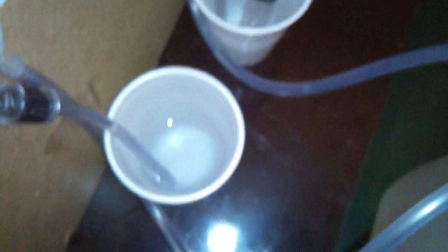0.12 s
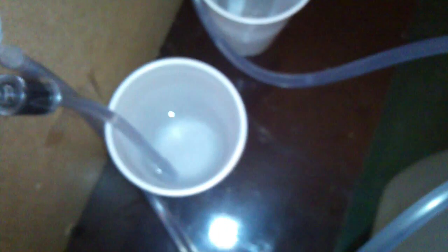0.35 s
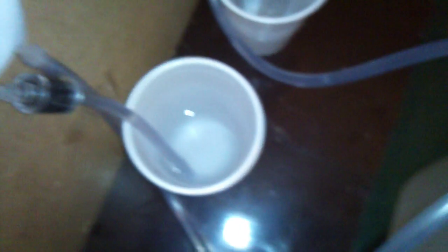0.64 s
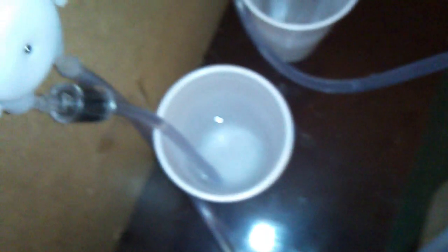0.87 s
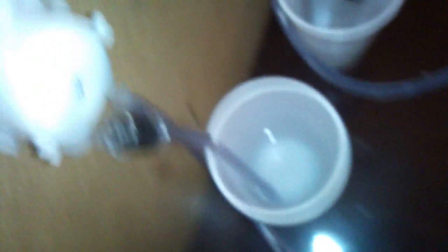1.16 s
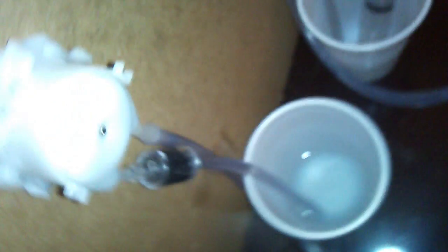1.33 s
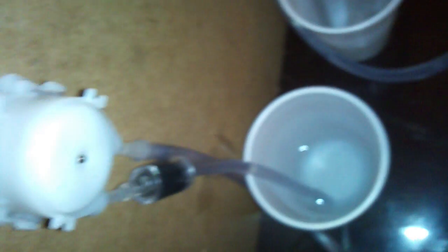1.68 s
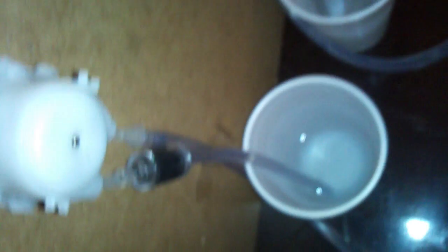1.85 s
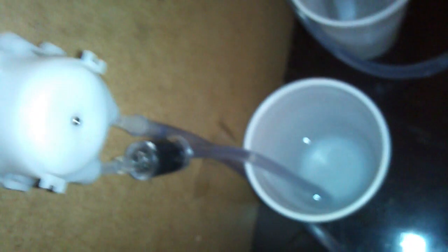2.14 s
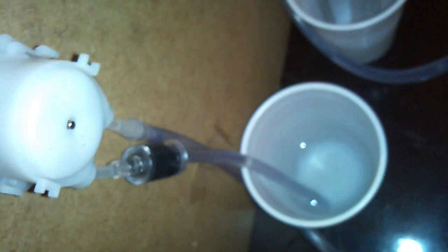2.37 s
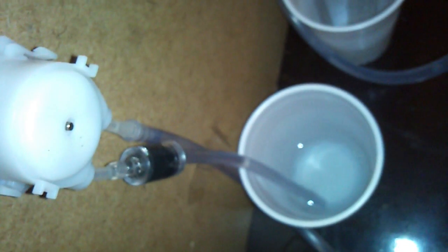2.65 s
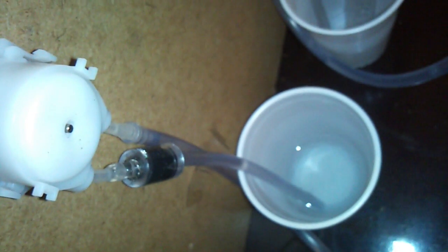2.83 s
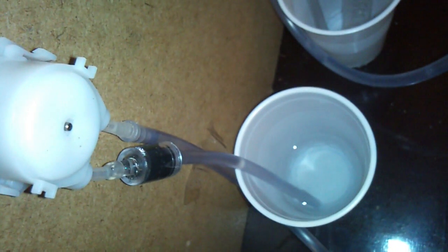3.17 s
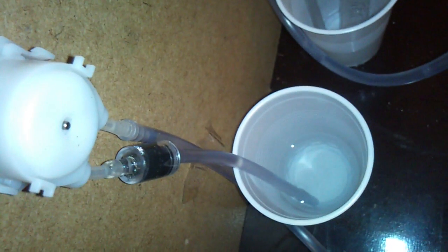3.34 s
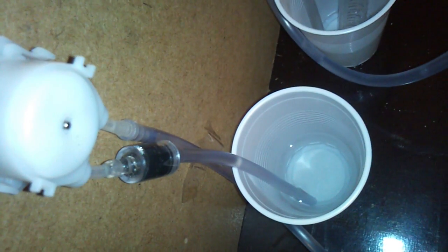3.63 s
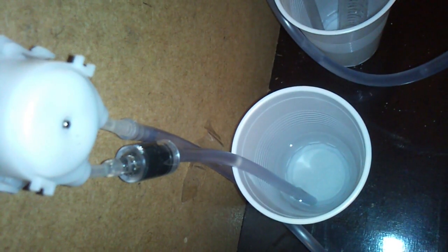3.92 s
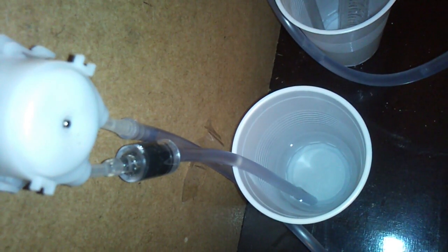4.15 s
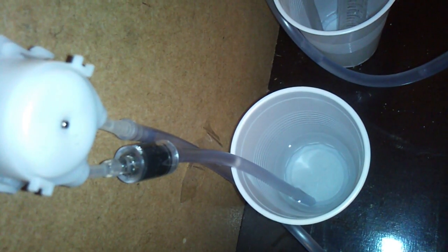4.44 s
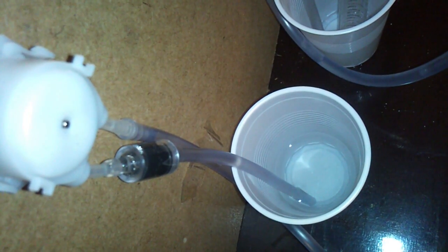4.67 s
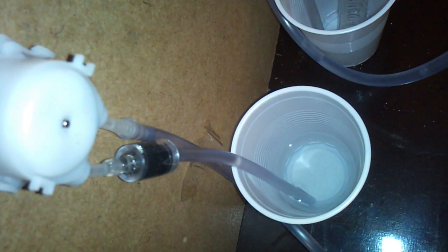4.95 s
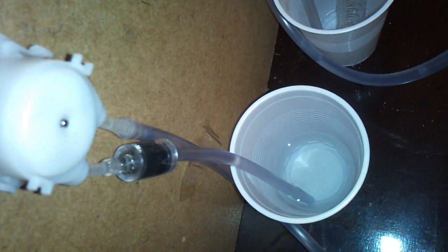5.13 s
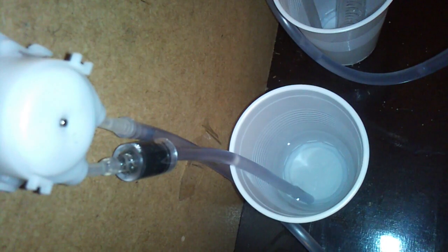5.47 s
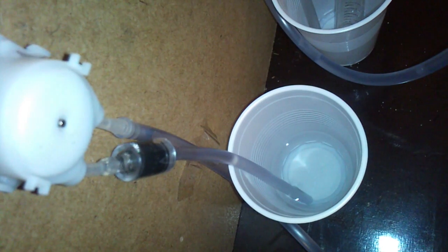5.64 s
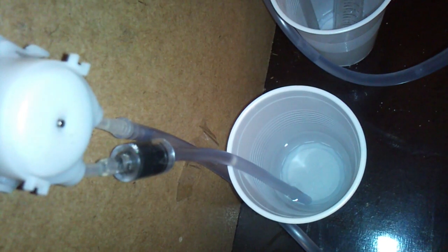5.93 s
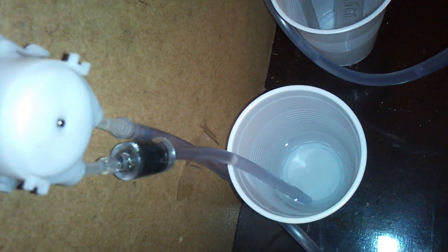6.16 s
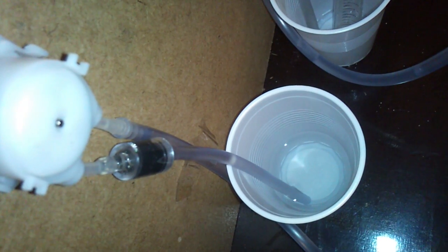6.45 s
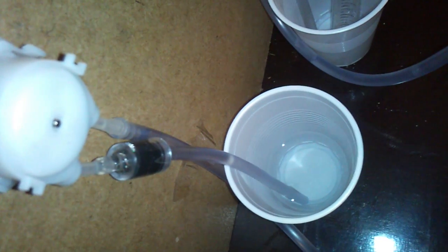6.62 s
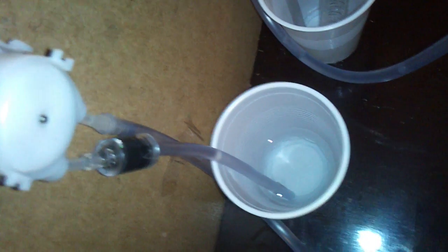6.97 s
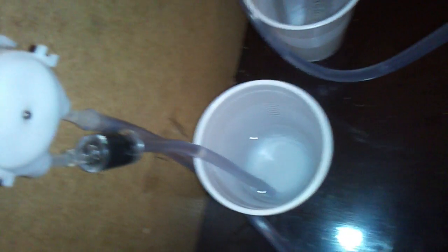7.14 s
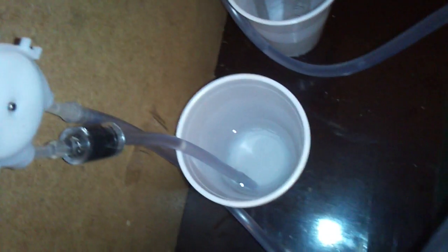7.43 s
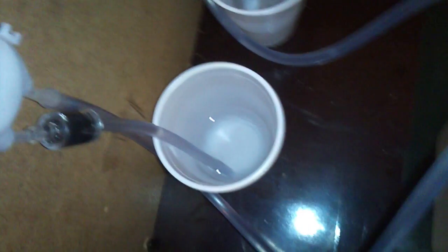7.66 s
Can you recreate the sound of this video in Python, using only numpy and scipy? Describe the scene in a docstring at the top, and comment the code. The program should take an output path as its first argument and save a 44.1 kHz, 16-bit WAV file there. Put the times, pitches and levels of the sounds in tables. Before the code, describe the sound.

Low wavering motor hum, soft wet patter in a plastic cup, a hand scraping and clicking plastic near the microphone, then one brief dragging rasp.

```python
"""From the start the hum of a small dosing pump on a table runs throughout, with mains hum and faint hiss, at
one microphone. The pump, a wavering tone with ringing friction noise, pushes liquid through a tube into a
plastic cup: soft, uneven pats made of decaying cup modes, with tiny bubbles, dry ticks and one faint squeak.
A hand scrapes (stick-slip noise) and clicks (struck modes) on the housing close to the microphone; later
something is dragged with a short rasp of friction noise that surges evenly. The recorder is narrow-band."""
import sys
import numpy as np
from scipy import signal
from scipy.fft import rfft, irfft, next_fast_len
from scipy.io import wavfile
from scipy.ndimage import map_coordinates

SR = 44100
rng = np.random.default_rng(int(sys.argv[2]) if len(sys.argv) > 2 else 0)


def unload_audio(sound):
    """Save the sound as a 16-bit wav file, at the path given as the first command line argument."""
    columns = np.transpose(np.atleast_2d(sound))
    # keep every value between -1 and 1, then stretch to whole-number steps
    steps = np.round(np.clip(columns, -1, 1) * 32767)
    wavfile.write(sys.argv[1], SR, steps.astype(np.int16))


N = 343539
T = np.arange(N) / SR  # t/s of every sample


def amp(db):
    """Decibels to gain."""
    return 10 ** (np.asarray(db) / 20)


def unit(x):
    """Scale to rms 1."""
    return x / np.sqrt(np.mean(x ** 2) + 1e-20)


def curves(rows):
    """One value per sample for each column after the time."""
    s, *columns = np.transpose(rows)
    return [np.interp(T, s, column) for column in columns]


def wobble(rate):
    """A smooth random curve, rate knots a second."""
    knots = rng.standard_normal(int(N * rate / SR) + 4)
    return map_coordinates(knots, [T * rate])


def filtered(x, response):
    """x times a response of frequency."""
    m = next_fast_len(N + SR // 2)
    spectrum = rfft(x, m) * response(np.fft.rfftfreq(m, 1 / SR))
    return irfft(spectrum, m)[:N]


def coloured(x, points):
    """x shaped by (f/Hz, level/dB) points, at rms 1."""
    f, db = np.transpose(points)
    return unit(filtered(x, lambda hz: amp(np.interp(np.log(hz + 1), np.log(f), db))))


def resonant(x, rings):
    """x through (f/Hz, width/Hz, level/dB) resonances of alternating sign, at rms 1."""
    def response(f):
        total = 0
        for k, (centre, width, db) in enumerate(rings):
            damping = 1j * f * width
            total = total + (-1) ** k * amp(db) * damping / (centre * centre - f * f + damping)
        return total
    return unit(filtered(x, response))


def grains(rate, spread_db):
    """Random tiny impulses of uneven size, at rms 1."""
    present = rng.random(N) < rate / SR
    size = rng.standard_normal(N)
    spread = amp(spread_db * np.clip(rng.standard_normal(N), -2, 2))
    return unit(present * size * spread)


def blows(times, db):
    """One impulse at each time."""
    return np.bincount(np.round(np.asarray(times) * SR).astype(int), amp(db), N)[:N]


def played(strikes, sound):
    """The same sound at every strike."""
    return signal.fftconvolve(strikes, sound)[:N]


def add(track, s, sound):
    """Mix a sound into a track at time s."""
    part = track[round(s * SR):][:len(sound)]
    part += sound[:len(part)]


def modes(table, attack):
    """One decaying complex wave per mode, so that each strike can set its own phase."""
    t = np.arange(SR // 3) / SR
    hz, db, t60 = np.transpose(table)[:, :, None]
    return amp(db - 60 * t / t60) * np.exp(2j * np.pi * hz * t) * (1 - np.exp(-t / attack))


def bursts(times, db, colour, t60):
    """Coloured noise that flares at each time and dies away."""
    t = np.arange(SR // 3) / SR
    decay = amp(-60 * t / t60) ** 2 * (1 - np.exp(-t / 0.0046))
    power = played(blows(times, db) ** 2, decay)
    return np.sqrt(abs(power)) * coloured(rng.standard_normal(N), colour)


def stroke(start, length, swell_db, rise_db_per_s, fall_db_per_s):
    """Gain of one rubbing movement: a quick rise, a hold that swells or eases off, a release."""
    t = T - start
    hold = swell_db * (np.clip(t / length, 0, 1) - .5)
    rise = rise_db_per_s * np.maximum(-t, 0)
    fall = fall_db_per_s * np.maximum(t - length, 0)
    return amp(hold - rise - fall)


# the pump motor's tone, before its wavering: t/s, f/Hz, level/dB (rms)
MOTOR_COURSE = [(0.0, 118.3, -63), (0.19, 120.8, -54), (0.43, 120.1, -60.5), (0.67, 124.6, -64.5),
                (1.26, 124.2, -64.5), (1.34, 116, -66.5), (1.54, 120.7, -56.5), (1.93, 117.5, -60.5),
                (2.91, 121.8, -55), (3.58, 122.7, -61), (4.47, 121.3, -54.5), (4.6, 124.9, -62),
                (5.12, 118.4, -55), (5.19, 118.3, -67), (5.32, 120.8, -56), (7.03, 122.1, -58),
                (7.7, 119.8, -55), (7.79, 121, -64)]
# mains hum: f/Hz, level/dB (rms)
MAINS_HUM = [(50, -72.5), (100, -63), (200, -70), (300, -68.5)]
# spectrum of the motor's shudder: f/Hz, relative level/dB
SHUDDER_COLOUR = [(68, -35.5), (88, -6), (97, -9), (110, 0.5), (130, -2), (150, -27.5), (220, -48)]


def pump(waver_db=0.36, waver_hz=0.85, flutter_db=0.75, rumble_db=-68.0):
    """The motor's tone sags and recovers with the load and wavers over a low shudder and mains hum."""
    hz, db = curves(MOTOR_COURSE)
    level = amp(db + waver_db * wobble(10) + flutter_db * wobble(28))
    phase = 2 * np.pi * np.cumsum(hz + waver_hz * wobble(7.1)) / SR
    motor = level * np.sin(phase)
    mains = sum(amp(db) * np.sin(2 * np.pi * (f * T + rng.random())) for f, db in MAINS_HUM)
    shudder = amp(rumble_db) * coloured(rng.standard_normal(N), SHUDDER_COLOUR)
    return np.sqrt(2) * (motor + mains) + shudder


# what the running pump keeps ringing in its casing and the table: f/Hz, width/Hz, relative level/dB
CASING_RINGS = [(185, 8.7, -1.5), (278.7, 14, 2), (303.2, 14, 5.5), (364, 20, -10), (426, 12, -7.5),
                (525, 29, -8), (614.5, 14, -3.5), (685.4, 14, 7.5), (756, 13, -1), (809, 32, -6.5),
                (955, 16, -5)]


def whirr(level_db=-65, pulsing=0.6, waver_db=2.5):
    """The mechanism rubs once a turn, now harder, now softer, and keeps the casing's resonances sounding."""
    hz, _ = curves(MOTOR_COURSE)
    turning = np.sin(2 * np.pi * np.cumsum(hz) / SR)
    rubbing = (1 + pulsing * turning) * rng.standard_normal(N)
    return amp(level_db + waver_db * wobble(12)) * resonant(rubbing, CASING_RINGS)


# spectrum of the room noise: f/Hz, relative level/dB
ROOM_COLOUR = [(15, -3.5), (35, -7), (70, -9), (150, -4), (240, -8.5), (300, -2.5), (380, -9), (560, -5.5),
               (690, -4.5), (800, -6), (1000, -14.5), (1500, -17.5), (2500, -20), (4000, -23),
               (7200, -27.5)]


def room(level_db=-62):
    """A steady, slightly wavering background of coloured noise."""
    return amp(level_db + 0.62 * wobble(7.7)) * coloured(rng.standard_normal(N), ROOM_COLOUR)


# faint rustles of handling: t/s, level/dB
HAND_RUSTLES = [(0.005, -56), (.41, -59), (.92, -67.5)]
# their spectrum: f/Hz, relative level/dB
DRY_RUSTLE_COLOUR = [(300, 2.5), (1000, 1), (2800, -6.5), (4000, -18.5), (7000, -19)]
RUSTLE_FADE_DB_PER_S = 132  # on either side of each peak


def rustle():
    """Faint dry rustles, dense uneven grains, swell and fade while the hand moves into place."""
    gain = sum(amp(db - RUSTLE_FADE_DB_PER_S * abs(T - s)) for s, db in HAND_RUSTLES)
    return gain * coloured(grains(rate=3700, spread_db=-4.0), DRY_RUSTLE_COLOUR)


# the pats of liquid, before trims: t/s, level/dB, brightness/dB, after-slap level/dB re the pat
LIQUID_PATS = [(0.052, -39, -9, -11), (0.288, -45, -12, -18), (0.331, -40.5, -9, 1.5),
               (0.452, -36.5, -6, -13), (0.512, -39, -12, 2.5), (0.59, -39.5, -18, -3.5),
               (0.672, -39.5, -7, 4), (0.775, -46, -14, 3), (0.831, -43, -16, 1.5), (0.888, -37, -18, -21),
               (0.913, -42, -5, 6), (2.073, -35.5, 0, 1), (2.134, -45.5, -13, -16), (2.195, -36.5, -3, -5),
               (2.245, -41.5, -9, -8), (2.338, -44.5, -5, -14), (2.388, -41.5, -11, -10),
               (2.433, -35, -3.5, 0), (2.56, -53, -14, -4), (2.688, -51, -15, -14), (2.735, -48, -10, -18),
               (2.775, -34.5, -0.5, -15), (2.833, -39.5, -11, -6), (2.915, -33, 0, -5),
               (2.971, -41, -7, -15), (3.009, -38.5, -14, -9), (3.19, -47, -12, -9),
               (3.229, -39.5, -11.5, -22), (3.272, -47.5, -14, -7), (3.414, -37, -14, -1.5),
               (3.496, -41.5, -13, -12), (3.517, -36.5, -10, -9), (3.578, -41.5, -10, -5),
               (3.655, -34, -1, 1), (3.716, -38.5, -7, 3.5), (3.796, -39.5, -14, -9),
               (3.886, -49, -14, -12), (3.914, -50.5, -14, -12), (3.96, -50, -12, -12),
               (4.008, -49, -4, -14), (4.074, -43.5, -14, -18), (4.112, -43.5, -9, -13),
               (4.21, -51.5, -16, -13), (4.255, -43.5, -7, 0.5), (4.342, -44.5, -14, -13),
               (4.386, -45, -16, -19), (4.436, -33.5, 1, -11), (4.495, -37, -7, 1), (4.643, -47.5, -16, -8),
               (4.755, -44, -8, -17), (4.792, -43, -11, -14), (4.835, -33, -7.5, -1.5),
               (4.917, -44.5, -12, -15), (4.954, -49, -14, -15), (4.998, -34.5, -3, -12),
               (5.055, -44, -10, -12), (5.091, -38, -14, -9), (5.138, -40, -10, 6), (5.298, -33.5, -3, -19),
               (5.355, -41, -9, -11), (5.393, -43.5, -9, -11), (5.435, -34, -2.5, 2.5),
               (5.496, -34.5, -3, -14), (6.193, -45.5, -18, -8), (6.274, -45, -12, -14),
               (6.333, -45, -3, -15), (6.373, -41.5, -12, -15), (6.44, -55, -14, -18),
               (6.468, -48, -14, -15), (6.603, -48, -14, -17), (6.657, -43, -10, -13),
               (6.693, -39, -12, -15), (6.777, -33.5, -2.5, -0.5), (6.835, -48, -11, -9),
               (6.897, -40, -8, 7), (6.978, -41, -11, -11), (7.03, -50, -16, -10), (7.07, -45, -15, -16),
               (7.1, -45.5, -14, -12), (7.14, -38, -13, -3.5), (7.197, -35, -2.5, 1),
               (7.253, -43.5, -8, -14), (7.299, -33, -3.5, -12), (7.356, -44.5, -8, -10),
               (7.453, -49, -9, -15), (7.497, -39.5, -3.5, -0.5), (7.588, -47.5, -15, -12),
               (7.696, -42, -7, 0.5), (7.78, -34, -2.5, -12)]
SLAP_S, SLAP_BRIGHT_DB = 0.019, -18.5  # a dull after-slap follows each pat
SMALL_PER_S, SMALL_DB, SMALL_SPREAD_DB, SMALL_BRIGHT_DB = 10, -54, 3, -7  # weak pats in between


def pushes(count=120):
    """Every push of the liquid as (t/s, level/dB, brightness/dB): pats, after-slaps, random faint pats."""
    rows = []
    for s, db, bright, slap in LIQUID_PATS:
        rows += [(s, db, bright), (s + SLAP_S, db + slap, SLAP_BRIGHT_DB)]
    for k, (when, size) in enumerate(rng.random((count, 2))):
        level = SMALL_DB + SMALL_SPREAD_DB * (2 * size - 1)
        rows.append(((k + when) / SMALL_PER_S, level, SMALL_BRIGHT_DB))
    return rows


# what every pat rings in the cup, the push itself dying fastest: f/Hz, relative level/dB, t60/s
CUP_MODES = [(190.5, -20.5, 0.24), (279.8, -21, 0.36), (305.5, -14.5, 0.21), (370.7, -21, 0.16),
             (429, -18, 0.14), (530.4, -15.5, 0.097), (614, -16, 0.18), (688, -9.5, 0.13), (761, -2, 0.033),
             (783, -14.5, 0.092), (816, -12.5, 0.081), (890, -12.5, 0.056), (954.4, -11.5, 0.11),
             (1045, -23, 0.062), (1202, -9, 0.1), (1251, 1, 0.037), (1275, -8.5, 0.082), (1300, -26, 0.058),
             (1440, -25.5, 0.026), (1603, -18, 0.071), (1850, -30, 0.1)]
# spectrum of the wet smack: f/Hz, relative level/dB
SMACK_COLOUR = [(400, -17), (800, -1), (1050, -2.5), (1300, -3), (1600, -10), (1900, -14.5), (2600, -25),
                (5000, -45)]
# spectrum of the sloshing liquid: f/Hz, relative level/dB
SLOSH_COLOUR = [(120, -23.5), (280, -2.5), (450, -0.5), (750, -16.5), (1000, -7.5), (1130, -8.5),
                (1300, -14), (1500, -23), (2200, -27.5), (4000, -37)]


def patter(trim_db=-1.13, bright_trim_db=-2, vary_db=1.67, detune=0.016, tail_db_per_s=50,
           slosh_db=-22.5, slosh_t60=0.26, smack_db=-15, smack_t60=0.11):
    """Each pat softly pushes the cup's modes, never quite alike; bright pats drive the upper modes more."""
    upper = np.transpose(CUP_MODES)[0] > 1130
    waves = modes(CUP_MODES, attack=np.where(upper, .0022, .0026)[:, None])
    out, rows, t = np.zeros(N), pushes(), np.arange(SR // 3) / SR
    phases = np.exp(2j * np.pi * rng.random((len(rows), len(CUP_MODES))))
    chances = rng.standard_normal((len(rows), len(CUP_MODES) + 2))
    for (s, db, bright), phase, (pitch, tail, *chance) in zip(rows, phases, chances):
        brightness = upper * (bright + bright_trim_db)
        gains = phase * amp(db + trim_db + brightness + vary_db * np.array(chance))
        low_ring = ((gains * ~upper) @ waves).imag
        high_ring = ((gains * upper) @ waves).imag
        # only the upper modes shift in pitch from pat to pat
        high_ring = np.interp(t * (1 + detune * pitch), t, high_ring)
        add(out, s, (low_ring + high_ring) * amp(tail_db_per_s * np.tanh(tail) * t))
    s, db, bright = np.transpose(rows)
    # a wet smack, strongest on loud bright pats, opens each push; the liquid sloshes on briefly
    smacks = bursts(s, db + bright + smack_db, SMACK_COLOUR, t60=smack_t60)
    sloshing = bursts(s, db + slosh_db, SLOSH_COLOUR, t60=slosh_t60)
    return out + smacks + sloshing


# the clearest tiny bubbles, ticks and a squeak in the tube:
# t/s, level/dB before the gain, f/Hz, ringing/cycles
TUBE_BUBBLES = [(0.873, -61, 6520, 4.3), (0.922, -56, 5990, 2.2), (2.3747, -53, 3350, 3),
                (3.0614, -55, 1729, 10), (3.3488, -53, 4600, 4.5), (3.3728, -50, 4800, 3.7),
                (3.377, -66, 4760, 150), (3.5206, -55, 7000, 1.6), (3.688, -55.5, 6200, 3.4),
                (3.838, -58, 1593, 9.7), (3.9692, -50.5, 1670, 4.3), (4.2522, -56, 2720, 5),
                (4.362, -62, 6070, 3.7), (4.466, -50, 5910, 1.6), (4.518, -47.5, 1730, 8),
                (4.717, -58, 6600, 2.28), (4.7623, -55.5, 5650, 2), (4.7942, -57, 5960, 2),
                (5.304, -51.5, 2804, 4.4), (5.475, -49.5, 2830, 7), (5.7244, -44.5, 6400, 2.9),
                (6.215, -59, 2954, 9), (6.217, -58.5, 5620, 18), (6.272, -61, 2760, 13),
                (6.2729, -46, 1750, 3.4), (6.2739, -43.5, 1436, 6), (6.289, -53, 1440, 21),
                (6.8713, -53, 4670, 5), (7.652, -52, 2284, 1.4)]
FIZZ_DB, FIZZ_HZ, FIZZ_CYCLES = -59, (2440, 6600), 6  # random bubbles: level before gain, pitch range


def bubbles(gain_db=2, splash_db=-13.0, splash_t60=0.1, count=10):
    """Tiny bubbles, dry ticks and one long faint squeak ring for their own cycles, each with a ragged splash."""
    out, t = np.zeros(N), np.arange(SR // 8) / SR
    fizz = [(when * T[-1], FIZZ_DB, np.interp(pitch, [0, 1], FIZZ_HZ), FIZZ_CYCLES)
            for when, pitch in rng.random((count, 2))]
    for s, db, hz, cycles in TUBE_BUBBLES + fizz:
        envelope = (1 - np.exp(-t / 0.00013)) * np.exp(-t * hz / cycles)
        bubble = envelope * np.sin(2 * np.pi * hz * t)
        ragged = unit(signal.fftconvolve(rng.standard_normal(len(t)), bubble)[:len(t)])
        splash = ragged * amp(splash_db - 60 * t / splash_t60)
        add(out, s, amp(db + gain_db) * (bubble + splash))
    return out


# before it slides, the skin creeps in jerks: first jerk, first gap, each gap over the last
CREEP_S, CREEP_GAP_S, CREEP_SLOWING = 1.0687, .0069, 1.08


def jerk_times(count=10):
    """When the creeping skin lets go: each gap is a little longer than the last."""
    gaps = CREEP_GAP_S * CREEP_SLOWING ** np.arange(count)
    return CREEP_S + np.cumsum(gaps) - gaps


CREEP_DB, CREEP_KNOCK_DB, CREEP_SCUFF_S = -43, 8.5, 0.00092  # middle level, knock, scuffing decay


def creep(vary_db=1.5, swell_db=2, top_db=-2, thump_db=-56):
    """A small dull click at every jerk, tending to grow as the pull builds; rows as in HOUSING_CLICKS."""
    times = jerk_times()
    swell = swell_db * np.linspace(-.5, .5, len(times))
    levels = CREEP_DB + swell + vary_db * rng.standard_normal(len(times))
    return [(s, db, CREEP_KNOCK_DB, top_db, CREEP_SCUFF_S, thump_db) for s, db in zip(times, levels)]


# clicks of the housing, before trims:
# t/s, level/dB, low-mode knock/dB, high-mode top/dB, scuffing decay/s, thump level/dB
HOUSING_CLICKS = [(0.2188, -31.5, -7, -9, 0.0034, -37.5), (0.3354, -34.5, 0.5, -2.5, 0.002, -35.5),
                  (0.7012, -40, 6.5, -4, 0.00092, -50), (0.7188, -38, 4.5, -0.5, 0.00067, -48),
                  (0.9567, -37.5, 3, -4, 0.0016, -43), (1.2612, -23.5, -4.5, -4, 0.00028, -57),
                  (1.2678, -22.5, 2, -6, 0.000085, -54), (1.3126, -26, -3, 4, 0.00092, -57),
                  (1.346, -27.5, 8.5, 2, 0.00043, -56), (1.6138, -33, -4, -2, 0.0029, -36.5),
                  (1.633, -41, 4.5, -2, .001, -54), (1.675, -46.5, 16.5, 2, 0.0012, -54),
                  (1.6879, -31, 0, 1, 0.00042, -50), (1.6993, -32.5, 0, 4, 0.00023, -55),
                  (1.992, -15, -2.5, 3.5, 0.000013, -48), (6.217, -42, -1, -9, 0.0068, -63)]
# resonances of the housing, rung by every click: f/Hz, relative level/dB, t60/s
HOUSING_MODES = [(228, -32, 0.022), (466, 4.5, 0.0047), (685, 8, 0.0063), (733, -14, 0.03),
                 (880, -11, 0.0045), (1620, -8, 0.0038), (2360, -5.5, 0.0057), (3330, -10, 0.0066),
                 (4470, -2.5, 0.0027), (5660, -7, 0.0029), (6800, -10.5, 0.0016)]


def clicks(knock_trim_db=1, vary_db=0.6, thump_hz=190, thump_t60=0.016, echo_db=-42):
    """Short scuffing contacts ring the housing's modes and thump its body; table and walls answer faintly."""
    out, t = np.zeros(N), np.arange(SR // 8) / SR
    waves = modes(HOUSING_MODES, attack=.00005).imag[:, :len(t)]
    sign, hz = (-1) ** np.arange(len(HOUSING_MODES)), np.transpose(HOUSING_MODES)[0]
    lower, upper = hz < 1800, hz > 4000
    thump = amp(-60 * t / thump_t60) * np.sin(2 * np.pi * thump_hz * t)
    for s, db, knock, top, scuff, thump_db in HOUSING_CLICKS + creep():
        contact = np.r_[1, rng.standard_normal(len(t) - 1)] * np.exp(-t / scuff)
        rings = signal.fftconvolve(contact[None], waves, axes=1)[:, :len(t)]
        # scuffing spreads a mode's energy in time without changing its amount
        even = np.linalg.norm(waves, axis=1) / np.linalg.norm(rings, axis=1)
        balance = lower * (knock + knock_trim_db) + upper * top
        levels = db + balance + vary_db * rng.standard_normal(len(HOUSING_MODES))
        add(out, s, (sign * even * amp(levels)) @ rings + amp(thump_db) * thump)
    echo = amp(echo_db - 60 * t / 0.024) * rng.standard_normal(len(t))
    return out + played(out, echo)


# strokes of the hand: start t/s, length/s, body level/dB, hiss level/dB, swell over the stroke/dB
HAND_STROKES = [(1.064, .095, -48.5, -71, 4.5), (1.167, 0.091, -47.5, -55, 5.5),
                (1.261, .056, -31, -43.5, -2.5), (1.333, .005, -40, -44, -3),
                (1.348, 0.048, -40, -47.5, -8.5), (1.407, 0.15, -42.5, -46.5, 8.5),
                (1.637, 0.054, -57.5, -55.5, 5), (1.703, 0.14, -50.5, -46, -2),
                (1.852, 0.058, -54.5, -55, 0), (1.91, 0.045, -52.5, -45.5, 7),
                (1.993, 0.029, -50.5, -49.5, -8)]
# the rubbed housing's drumming and hiss in the first grip: f/Hz, relative level/dB
FIRST_GRIP_BODY = [(60, -38), (150, -31), (260, -18.5), (400, -7.5), (570, -2), (780, 2.5), (940, -1),
                   (1150, -13), (1700, -13.5), (2400, -12.5), (4000, -35.5)]
FIRST_GRIP_HISS = [(900, -1.5), (1330, -4), (1550, 2), (1850, -10.5), (2450, -0.5), (3100, -2), (3480, 2),
                   (4050, -6), (4600, 1.5), (5050, -0.5), (5900, -9), (6700, -3), (7100, -9), (7600, -19)]
# the same in the second grip: f/Hz, relative level/dB
SECOND_GRIP_BODY = [(120, -26.5), (300, -1), (480, 0), (720, 0.5), (950, -4), (1150, -24), (2400, -40)]
SECOND_GRIP_HISS = [(900, -9.5), (1100, -6), (1300, -0.5), (1750, -0.5), (2250, -2), (2620, -7), (2950, -5),
                    (3280, -9.5), (3650, -3.5), (4300, -4.5), (4750, -10), (5500, -8), (6050, -10),
                    (6800, -10), (7600, -17.5)]
REGRIP_S = 1.62  # the hand shifts its grip
STROKE_RISE_DB_PER_S, STROKE_FALL_DB_PER_S = 891, 296


def scrape(thud_db=-52, coarse=0.53, crackle=0.66, judder_db=1.1, stuck_db=-3, slip_db=2.5):
    """Skin sticks and slips on plastic: coarse slips drum on the housing, fine ones hiss."""
    body, hiss = np.zeros(N), np.zeros(N)
    for start, length, body_db, hiss_db, swell_db in HAND_STROKES:
        gain = stroke(start, length, swell_db, STROKE_RISE_DB_PER_S, STROKE_FALL_DB_PER_S)
        body = np.maximum(body, amp(body_db) * gain)
        hiss = np.maximum(hiss, amp(hiss_db) * gain)
    # at first the skin sticks and only jerks forward, then it slides freely
    times = jerk_times()
    jerks = played(blows(times, np.zeros(len(times))), np.exp(-np.arange(SR // 50) / SR / 0.0024))
    sliding = np.clip((T - times[-1]) / 0.01, 0, 1)
    creeping = amp(stuck_db) + amp(slip_db) * jerks
    motion = (sliding + (1 - sliding) * creeping) * amp(judder_db * wobble(220))
    slips = unit(rng.standard_normal(N) + coarse * grains(rate=1500, spread_db=2.0))
    fine = unit(slips + crackle * grains(rate=2200, spread_db=-2.5))

    # the resonances move when the hand takes a new grip
    def gripped(x, first, second):
        return np.where(T < REGRIP_S, coloured(x, first), coloured(x, second))

    drumming = body * gripped(motion * slips, FIRST_GRIP_BODY, SECOND_GRIP_BODY)
    hissing = hiss * gripped(motion * fine, FIRST_GRIP_HISS, SECOND_GRIP_HISS)
    # the housing rocks once as the grip shifts
    thud = amp(thud_db) * np.exp(-((T - 1.57) / 0.043) ** 2) * np.sin(2 * np.pi * 48 * T)
    return drumming + hissing + thud


def wandering(x, share, rate):
    """x with its resonances drifting up and down by a small share of their pitch."""
    return map_coordinates(x, [np.cumsum(1 + share * wobble(rate))], mode="mirror")


# spectrum of the plain drag noise: f/Hz, relative level/dB
DRAG_COLOUR = [(150, -44), (250, -12), (300, -8), (346, -34), (422, -5.5), (673, -13.5), (809, -9),
               (973, -7), (1410, -7), (1530, -21), (2770, -12.5), (4180, -18), (7360, -29.5), (9570, -47),
               (16200, -120)]
# resonances of the drag: f/Hz, width/Hz, relative level/dB
DRAG_RINGS = [(450, 72, -2.5), (670, 48, 0.5), (975, 47, 2.5), (1392, 80, -9.5), (1800, 40, -9.5),
              (2190, 170, -15), (2880, 150, -10), (3450, 55, -9), (4240, 160, -11.5), (4720, 100, -13),
              (5600, 200, -21.5), (6850, 260, -22.5)]
# what each catch of the rasp sets off: f/Hz, width/Hz, relative level/dB
GROAN_RINGS = [(458, 76, -1), (603, 54, -7), (3020, 250, -27), (5600, 140, -19.5)]
RASP_START_S, RASP_LENGTH_S, RASP_DB, RASP_SWELL_DB = 5.7505, 0.392, -47, -0.2
RASP_RISE_DB_PER_S, RASP_FALL_DB_PER_S = 4000, 401


def rasp(period=0.0922, surge_db=5.0, plain_db=-3, sharpness=11, ring_db=-1.5, ring_sharpness=3,
         ring_lag_s=0.005):
    """Dense friction in slightly drifting resonances catches evenly; each catch groans and whistles."""
    friction = unit(rng.standard_normal(N) + 1.3 * grains(rate=1600, spread_db=-0.5))
    body = wandering(resonant(friction, DRAG_RINGS), share=0.012, rate=25)
    sound = unit(body + amp(plain_db) * coloured(rng.standard_normal(N), DRAG_COLOUR))
    cycle = 2 * np.pi * (T - 5.931) / period
    catch = np.exp(sharpness * (np.cos(cycle) - 1))
    # the ringing lags each catch and is silent for the first half period
    lag = 2 * np.pi * ring_lag_s / period
    ringing = np.exp(ring_sharpness * (np.cos(cycle - lag) - 1)) * (T > RASP_START_S + period / 2)
    treble = filtered(sound, lambda hz: hz ** 2 / (hz ** 2 + 2000 ** 2))
    surge = (amp(surge_db) - 1) * catch * (treble + 0.28 * sound)
    groan = amp(ring_db) * ringing * resonant(rng.standard_normal(N), GROAN_RINGS)
    drag = stroke(RASP_START_S, RASP_LENGTH_S, RASP_SWELL_DB, RASP_RISE_DB_PER_S, RASP_FALL_DB_PER_S)
    return amp(RASP_DB) * drag * (sound + surge + groan)


def scene():
    """Pump, liquid, handling and room at one microphone."""
    running = pump() + whirr() + room()
    liquid = patter() + bubbles()
    handling = rustle() + clicks() + scrape() + rasp()
    return (running + liquid + handling)[None]


TOP_HZ = 7450  # middle of the recorder's 300 Hz wide upper band edge


def record(dry, offset_db=-49):
    """The recorder keeps nothing above its band edge; its converter rests slightly below zero."""
    band = filtered(dry[0], lambda hz: np.clip((TOP_HZ - hz) / 300 + .5, 0, 1))
    return (band - amp(offset_db))[None]


dry = scene()
out = record(dry)
unload_audio(out)
```